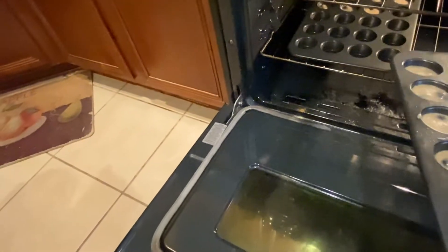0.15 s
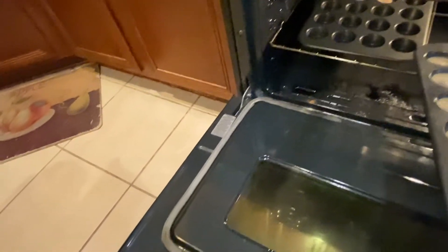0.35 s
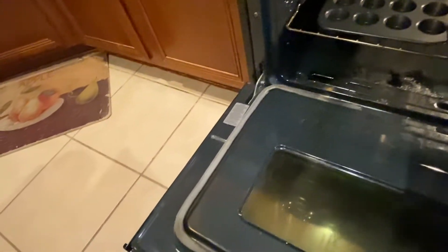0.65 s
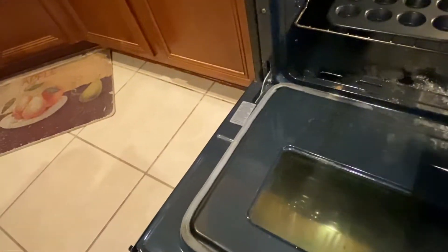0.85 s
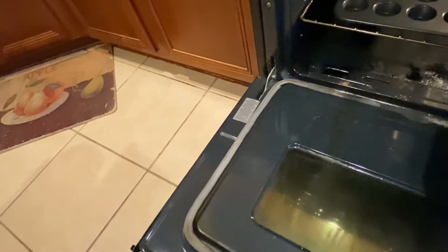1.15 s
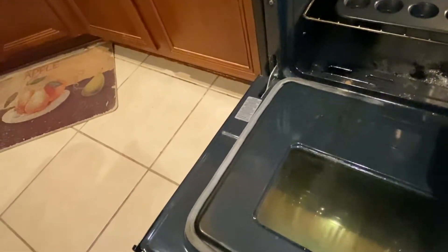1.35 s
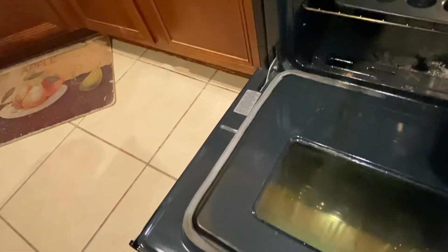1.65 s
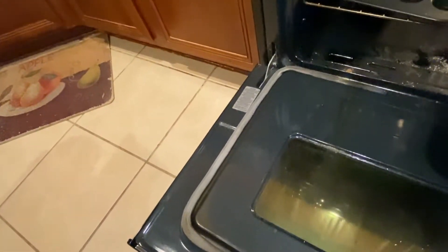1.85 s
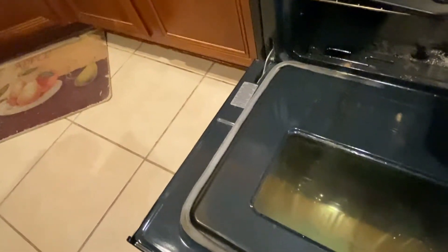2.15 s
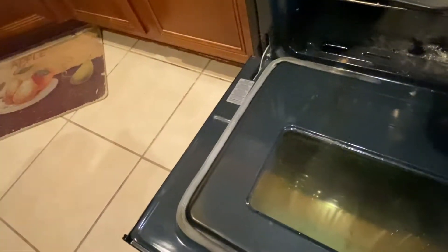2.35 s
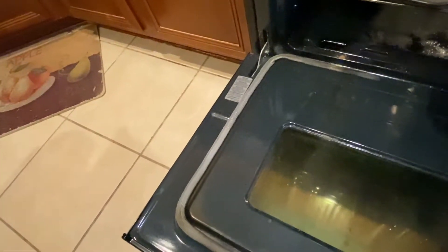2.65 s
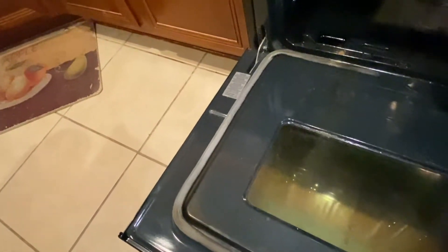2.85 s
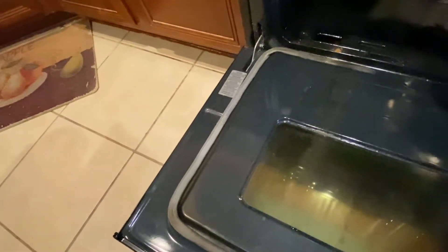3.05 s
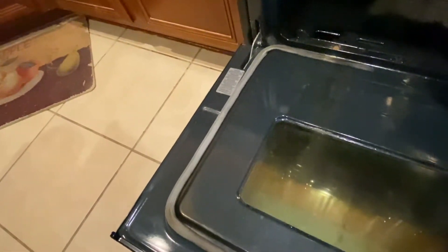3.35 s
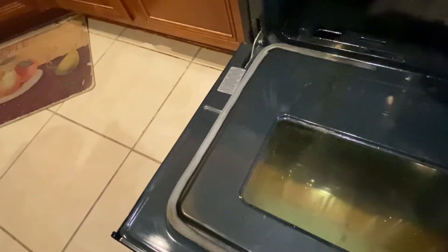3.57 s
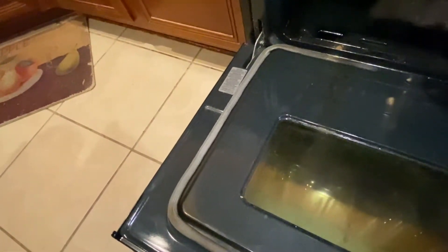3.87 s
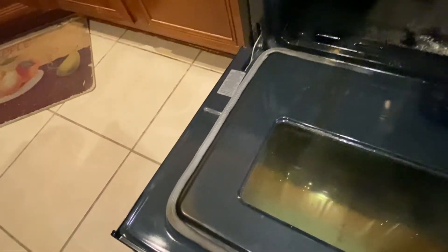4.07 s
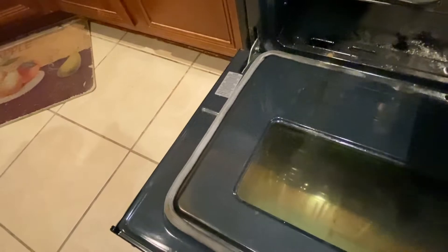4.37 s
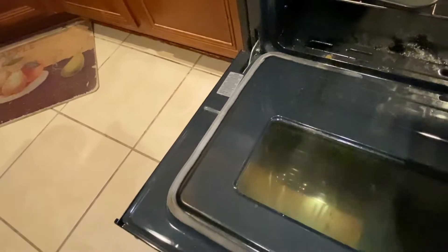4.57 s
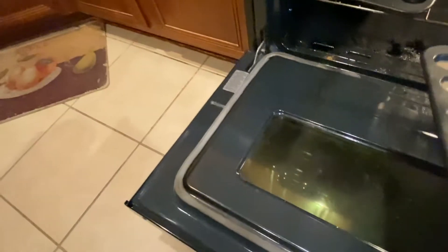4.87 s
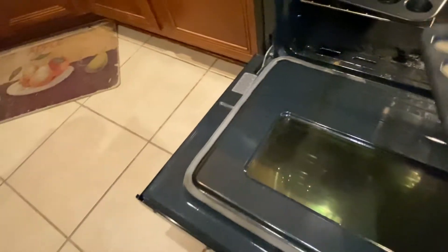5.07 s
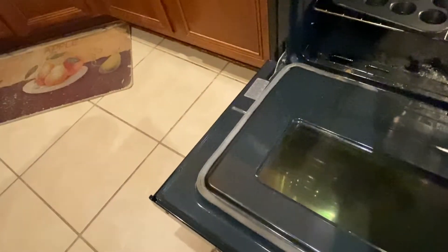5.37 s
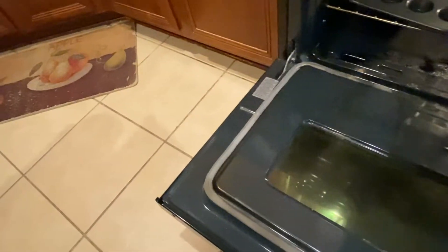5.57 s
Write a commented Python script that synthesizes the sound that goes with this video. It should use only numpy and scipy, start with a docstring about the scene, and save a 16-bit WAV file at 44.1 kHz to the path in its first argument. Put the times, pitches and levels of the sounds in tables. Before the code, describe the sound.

Close stereo sound inside a tiled kitchen: quiet motor hum first, then a dense burst of bright, short metallic clanks as tins are put down and pushed along oven wires, with hollow sheet-metal rumble. Light rubbing and tiny taps follow, then a thumping knock, a brief squeaky slide, another knock, and near-silence with fan.

```python
"""A fan motor hums in a kitchen; then metal muffin tins are set down, knocked and slid on a wire oven rack.
Light contacts clank: band-shaped noise, dense sheet modes and damped sinusoids of the tin and its cups.
Sliding rasps: uneven slip noise excites resonances. Heavy drops thump the oven's sheet-steel walls with a
falling sine and ringing modes, while low noise and a swelling low note rumble as the rack moves.
Decaying noise tails give the room; two close microphone ports differ in level and phase."""
import sys
import numpy as np
from scipy import signal
from scipy.fft import rfft, irfft, next_fast_len
from scipy.io import wavfile
from scipy.ndimage import uniform_filter1d, map_coordinates

SR = 44100
rng = np.random.default_rng(int(sys.argv[2]) if len(sys.argv) > 2 else 0)


def store_wav(level_fs):
    """Save 16-bit WAV to argv[1]."""
    pcm = np.round(np.clip(np.atleast_2d(level_fs), -1, 1) * 32767)
    wavfile.write(sys.argv[1], SR, pcm.T.astype(np.int16))


N = 252252

# Tin on wire: t/s, level/dB, rise/ms, bass tilt/dB (gain at 800 Hz), treble tilt/dB (9.5 is added at 8 kHz), #
# one cup f/Hz, its relative level/dB, another cup f/Hz, its relative level/dB
CONTACTS = [(0.89, -59, 2.9, -8, -13, 5640, -12, 6300, -10),
            (0.9318, -13.5, 2.2, 6.5, -13.5, 1100, -9, 3100, -10.5),
            (0.942, -19, 3, 5, -30, 948, -1, 1133, -3),
            (0.9903, -17.5, 1.4, -13, -22.5, 3340, -2, 4490, -9),
            (1.075, -32, 2, -4, -29, 3900, -9, 3290, -10), (1.146, -34, 3.3, 1, -26, 2980, -6, 4460, -10),
            (1.2293, -24, 0.73, 9.5, -22.5, 1163, -2, 3900, -7.5),
            (1.345, -14, 2.9, -1, -8, 1050, -14, 3650, -9),
            (1.366, -16.5, 1.5, 4.5, -15.5, 1078, -5.5, 3100, -20),
            (1.388, -21.5, 4.6, 3.5, -14, 1100, -7, 3400, -10),
            (1.419, -13.5, 6.4, 3.5, -10, 4024, -9, 4820, -10),
            (1.44, -21, 4, -1, -12.5, 3100, -8, 5800, -10),
            (1.4587, -17, 3.7, -1, -11.5, 3360, -8, 6560, -11),
            (1.4958, -23.5, 1.1, 5.5, -18, 1220, -27, 2300, -25),
            (1.512, -33, 2, 2, -15, 3280, -11, 4400, -4), (1.562, -38.5, 2, -7, -22, 2040, 8, 3400, -21),
            (1.688, -29.5, 1.4, 2.5, -20, 1120, -12, 2060, -5),
            (1.72, -16, 9.4, -0.5, -3, 1086, 1.5, 5240, -4),
            (1.7961, -7.5, 0.81, -8, -15.5, 3070, -5, 1440, -11.5),
            (1.8545, -19, 1.7, -2, -8.5, 2050, -6, 4550, -14),
            (1.903, -36.5, 1.8, 6, -14.5, 2330, -9, 5220, 3.5),
            (2.029, -17.5, 4, -9, -8, 2250, -8, 4680, -20),
            (2.0476, -18, 8.2, 3, -17.5, 3090, -8, 1887, -6),
            (2.091, -25, 2.1, 2.5, -16, 1855, -1, 3937, -8),
            (2.122, -35.5, 2.8, 5, -23, 2313, 7.5, 3120, 0), (2.134, -39, 4, -5, -29, 894, 7.5, 4060, -12),
            (2.172, -44.5, 3.3, -13, -24, 2260, 10, 855, -4), (2.25, -37, 3.6, 7, -23, 3060, -5, 2400, -12),
            (2.261, -33.5, 4, -11, -28.5, 986, -4.5, 1785, 0),
            (2.3065, -38.5, 3, -1, -24.5, 990, -1.5, 2650, -10),
            (2.364, -32.5, 5.6, -0.5, -16, 1133, -6, 5740, -7),
            (2.433, -36, 2.1, 0, -24, 2280, -2, 5700, -9), (2.535, -49, 3, -9, -13, 5800, -7, 1080, -11),
            (2.579, -47, 2, -2, -20, 5950, -10, 2350, -10),
            (2.635, -45.5, 5.3, -22, -29, 3930, 3, 4300, -3),
            (2.652, -42.5, 1.8, -26, -22, 2590, -6, 3110, -6),
            (2.681, -46.5, 4, -12, -11, 4050, -6, 6600, -13),
            (2.7945, -33.5, 6.6, -22, -30, 3120, -6, 3940, -8),
            (2.83, -40, 3.2, -10, -26.5, 2170, -9, 3980, -11),
            (2.856, -42, 3, -3, -18, 3980, -10, 2380, -8), (2.883, -45, 2.7, -2, -15, 2670, 0, 3360, -10),
            (2.925, -48, 3.6, 12, -6.5, 930, -11, 6650, -13),
            (2.9814, -42.5, 1.6, -2, -14, 2330, -1, 3935, -8),
            (3.069, -46.5, 1.5, 1.5, -30.5, 2270, -2.5, 1030, -22),
            (3.171, -44.5, 1.6, -9, -22.5, 2307, -5, 4000, -13.5),
            (3.412, -51, 2.8, 3, -31.5, 2400, -7, 1310, -5.5),
            (3.429, -37, 3.2, 8.5, -31, 1097, -1, 2230, -1),
            (3.437, -39.5, 1.8, 7.5, -43.5, 1484, 8.5, 2300, -4),
            (3.463, -44, 3.6, 4.5, -27, 1190, -3, 2100, -10),
            (3.492, -49, 2.7, -1.5, -14, 3330, -12, 2730, -8),
            (3.5145, -47, 4, 3, -42, 1210, -2.5, 5520, -11), (3.982, -46, 6, -8, -22.5, 2570, 0, 4000, -4),
            (4.0334, -16, 0.86, 6, -20.5, 993, -22, 1544, -14), (4.095, -38, 3, 3, -24, 2630, -2, 4000, 0),
            (4.187, -30, 2.8, 1, -16, 2630, -9, 2370, -23),
            (4.3381, -24, 0.66, 12.5, -21, 905, -9, 1186, -16),
            (4.787, -51, 0.45, -1.5, -33, 1890, -1.5, 950, -8.5),
            (5.1258, -64.5, 2, 6, 0, 6290, -12.5, 2610, -18),
            (5.188, -61, 1.6, 16, -6, 6350, -14, 2610, -20),
            (5.366, -70.5, 2.1, 13.5, 1, 2740, -20, 6200, -19.5),
            (5.429, -65.5, 2.2, 9.5, -1.5, 6230, -13.5, 2610, -17.5),
            (5.665, -58, 2.9, 11.5, -9.5, 2580, -13.5, 6160, -19)]
# Clear modes of the tin: f/Hz, relative level/dB, t60/s (before the hand's damping)
TIN_MODES = [(1153, -10, 0.15), (1458, -8, 0.22), (1904, -6.5, 0.27), (2168, -6, .15), (2235, -3, 0.19),
             (2800, -5, .15), (3070, 0.5, 0.13), (3274, -4, 0.25), (3970, -0.5, .12), (4160, -6, .12),
             (4640, -9, 0.063), (5480, -10, 0.078), (6030, -2, 0.22), (6620, 3, 0.14), (7200, -6, .1)]
# Spectrum of the metallic crash: f/Hz, relative level/dB
CRASH_SPECTRUM = [(150, -22), (250, 3.5), (393, -9), (493, -14.5), (802, -22.5), (1080, -16), (1280, -25.5),
                  (1470, -15.5), (1730, -17.5), (7310, -16.5), (11900, -22), (13200, -43.5), (14400, -21),
                  (16000, -34.5)]
CLANK_T60_S, CUP_T60_S = 0.14, 0.065
NOISE_T60_SHARE = 0.84  # crash noise at 3 kHz, as a share of the clank's t60
TIN_DB, CUP_ROOM_DB = -19.5, -7  # clear modes under the crash; the cups reach the room weaker
SHEET_DB, SHEET_SCATTER_DB = -4.5, 2.5  # peak of the dense modes beside the crash; their spread per blow
SHEET_T60_S = 0.17  # middle value at 3 kHz

# Rubbing on the wires, one list per stroke (drag, push, drag, pull, last drag): t/s, rasp level/dB
RUB_STROKES = [
    [(0.98, -72), (1.09, -52), (1.57, -53), (1.91, -46), (2.15, -54), (2.31, -54.5), (2.6, -65),
     (2.7, -61.5), (2.8, -52), (2.96, -62), (3.09, -73), (3.23, -90)],
    [(3.76, -93), (3.83, -70), (3.87, -61), (3.914, -54), (4.002, -48.5), (4.035, -53.5)],
    [(4.035, -53), (4.161, -55), (4.237, -50), (4.345, -60.5)],
    [(4.345, -78), (4.409, -56.5), (4.639, -61), (4.77, -69), (4.82, -75), (4.87, -74), (4.95, -92)],
    [(4.75, -86), (4.9, -74.5), (5.271, -88)],
]
# Resonances of the dragged tin: f/Hz, width/Hz, relative level/dB
DRAG_PEAKS = [(1190, 90, -4.5), (2200, 350, -4), (2612, 140, -9), (3050, 56, -17), (3390, 36, -10),
              (4150, 140, -4), (5100, 150, -13.5), (6850, 56, -2)]
# Resonances that a push keeps singing: f/Hz, width/Hz, relative level/dB
PUSH_PEAKS = [(2600, 190, -6), (3208, 90, -6.5), (4000, 88, -2), (5050, 69, -4.5), (7060, 200, -11.5),
              (7810, 110, -10.5)]
# Resonances that a pull keeps singing: f/Hz, width/Hz, relative level/dB
PULL_PEAKS = [(1778, 230, -7), (2418, 70, 2), (3286, 120, -12), (4123, 260, -3), (4630, 200, -5.5),
              (5620, 230, 0.5), (6800, 370, -9.5)]
IDLE_RASP_DB, IDLE_HISS_DB = -81.5, -89  # the hand never holds the tin quite still

# Heavy drops: t/s, thump level/dB, wall boom level relative to the thump/dB
HEAVY_DROPS = [(0.9319, -10, -27), (1.23, -17, -13.5), (4.033, -11, -19), (4.3378, -15.5, -35)]
# Modes of the oven walls: f/Hz, relative level/dB, t60/s (limited to 0.8 s when rung)
WALL_MODES = [(117.8, -8, 1.4), (259, -2, 0.12), (354, 2, 0.2), (500, -9, 5.0), (630, -14, 0.39)]
GLIDE_FROM_HZ, GLIDE_TO_HZ, GLIDE_S = 494.7, 111, 0.0095
THUMP_RISE_S, THUMP_HOLD_S, THUMP_T60_S = 0.0094, 0.022, 0.035

# Wall rumble while the rack moves: t/s, level/dB
RACK_LEVEL = [(0.89, -61), (0.97, -38.5), (1.27, -45.5), (1.39, -32), (1.52, -33), (1.68, -47.5),
              (1.85, -28.5), (2.05, -44.5), (2.68, -51.5), (2.82, -47), (2.98, -49), (3.27, -62),
              (3.48, -46.5), (3.72, -61.5), (3.91, -51), (4.03, -53), (4.24, -44), (4.38, -61),
              (4.48, -42.5), (4.56, -51), (5.72, -66)]
# Spectrum of the wall rumble: f/Hz, relative level/dB
RUMBLE_SPECTRUM = [(47, -34), (80, -9), (108, -2), (205, -11), (256, 2.5), (334, -19), (471, -12),
                   (559, -20.5), (900, -23), (1170, -24), (1980, -120)]
# Jolts that set the cavity's lowest note swelling: t/s at its maximum, level/dB
CAVITY_JOLTS = [(0.98, -35), (1.1, -44.5), (1.29, -39.5), (1.44, -40), (1.54, -43), (1.91, -34.5),
                (2.08, -41), (2.22, -48.5), (2.62, -47.5), (2.979, -47.5), (4.121, -34.5), (4.401, -42),
                (5.0, -55)]
BOOM_SWELL_S, BOOM_T60_S, BOOM_HZ = 0.03, 0.38, 58

# Reverberation of oven cavity and kitchen: f/Hz, t60/s
ROOM_T60 = [(100, 0.24), (500, 0.52), (2000, 0.44), (6000, 0.39), (14000, 0.04)]
# Tins and echoes, likeness at the two ports: f/Hz, correlation
TIN_LIKENESS = [(60, 0.96), (300, .85), (750, .7), (1000, 0.93), (1400, 0.29), (2200, 0.052), (9000, 0.88),
                (14000, 0.061)]
# Left port over right: f/Hz, level/dB
PORT_LEAN = [(60, -2.5), (150, -6), (380, -4), (950, -2), (2380, -0.5), (5980, -0.5), (15000, -2)]
# Phase by which the left port lags the right: f/Hz, lag/rad
PORT_LAG = [(50, .55), (300, .75), (500, 1.6), (700, 2.6), (950, 1.5), (1300, 1.6), (1800, 2.4),
            (2500, 1.6), (10000, 1.6), (14000, 0)]

# Spectrum of the fan's air noise: f/Hz, relative level/dB
AIR_SPECTRUM = [(15, -26), (25, -11), (81, -3), (129, -23.5), (158, -6.5), (205, -8), (240, -6),
                (374, -10.5), (415, -12), (485, -13.5), (1110, -24.5), (1440, -31.5), (1560, -37),
                (12500, -65), (16200, -95.5), (22000, -120)]
# Fan noise, likeness at the two ports: f/Hz, correlation
AIR_LIKENESS = [(60, 0.67), (200, 0.94), (330, -0.16), (520, 0.17), (720, -0.65), (1200, -0.01),
                (3000, 0.41), (10000, -0.86), (14500, 0.91)]
# Tones of the fan motor: f/Hz, rms level/dB before unsteadiness and port balance
MOTOR_TONES = [(59.2, -58), (75.4, -63), (188.4, -57), (376.8, -72.5), (468.3, -77.5)]
AIR_DB = -56  # before unsteadiness and port balance
TOP_HZ = 16000


def clanks():
    """Impact excitation: a brief contact rings many modes; noise, dense modes, clear modes and cups add up."""
    out, cups = np.zeros((2, N + SR)), np.zeros(N + SR)
    t = np.arange(SR // 4) / SR
    modes = sheet(t, count=200)
    for s, db, rise_ms, low_db, top_db, cup_hz, cup_db, next_hz, next_db in CONTACTS:
        hit = crash(t)
        rattle = chatter(t, CLANK_T60_S, count=70)
        hit += amp(-4.0) * rattle / np.abs(rattle).max()
        draw = rng.standard_normal((2, 2, len(modes)))
        dense = (draw[0] * amp(SHEET_SCATTER_DB * draw[1])) @ modes
        hit += amp(SHEET_DB) * dense / np.abs(dense).max()
        # the hand damps the tin; its clear modes enter the first channel only
        hit[0] += amp(TIN_DB - 30 * t / CLANK_T60_S) * ring(TIN_MODES, t, scatter_db=3)

        rise_s = max(rise_ms, 0.3) / 1000
        onset = amp(db) * (1 - np.exp(-(t / rise_s) ** 2))
        tilt = [(800, low_db), (2200, 0.0014), (4500, 0.16 * (top_db + 13.5)), (8000, top_db + 9.5)]
        start = round(s * SR)
        cup_modes = split_pair(cup_hz, cup_db) + split_pair(next_hz, next_db)
        cups[start:][:len(t)] += onset * ring(cup_modes, t, scatter_db=1.5)
        out[:, start:][:, :len(t)] += onset * filtered(hit, lambda hz: amp(along(tilt, hz)))
    return out[:, :N], cups[:N]


def crash(t):
    """Frequency-dependent damping: shaped noise at peak 1 dies faster in the treble."""
    hz, frame, z = signal.stft(rng.standard_normal((2, len(t))), SR, nperseg=128)
    life = NOISE_T60_SHARE * CLANK_T60_S * (np.maximum(hz, 300) / 3000)[:, None] ** -0.25
    z = z * amp(along(CRASH_SPECTRUM, hz))[:, None] * amp(-60 * frame / life)
    noise = signal.istft(z, SR, nperseg=128)[1][:, :len(t)]
    return noise / np.abs(noise).max()


def chatter(t, t60, count):
    """Repeated impact: the tin bounces on other wires; each tiny touch rings one short mode of its own."""
    draw = rng.random((4, count, 1))
    hz = 700 * 14 ** draw[0]
    late = -0.1 * t60 * np.log(draw[1])
    age = np.clip(t - late, 0, 1)
    touch_t60 = 0.0046 + 0.041 * draw[3]
    strength_db = along(CRASH_SPECTRUM, hz) - 2 * np.log(draw[2]) - 30 * late / t60
    touches = amp(strength_db - 60 * age / touch_t60) * np.sin(2 * np.pi * hz * age)
    return touches.reshape(2, -1, len(t)).sum(1)  # half the touches to each channel


def sheet(t, count):
    """Modal density of a plate: sine and cosine of each mode, with pitch and life kept from blow to blow."""
    draw = rng.standard_normal((2, count, 1))
    hz = np.geomspace(700, 12000, count)[:, None] * np.exp(0.01 * draw[0])
    t60 = SHEET_T60_S * (hz / 3000) ** -0.3 * np.exp(0.3 * np.clip(draw[1], -2, 2))
    fade = amp(along(CRASH_SPECTRUM, hz) - 60 * t / t60) * np.sqrt(hz / 3000)
    phase = 2 * np.pi * hz * t
    return np.concatenate([fade * np.sin(phase), fade * np.cos(phase)])


def split_pair(hz, db):
    """Beating: a split cup mode has a weaker partner 3 % higher."""
    return [(hz, db, CUP_T60_S), (1.03 * hz, db - 8, CUP_T60_S)]


def strokes():
    """Stick-slip friction: the rim catches on the wires in uneven slips that feed the tin's resonances."""
    hiss = rng.standard_normal((2, N)) * amp(1.5 * wobble(300) + 2.9 * wobble(54))
    hiss = unit(filtered(hiss, lambda f: amp(along(CRASH_SPECTRUM, f)) / (1 + (6000 / (f + 1)) ** 6)))
    out = amp(IDLE_HISS_DB + 3 * wobble(3.7)) * hiss
    # peaks, broadband bed gain, jolts per second, patch depth/dB, hiss relative to rasp/dB
    drag = (DRAG_PEAKS, 0.2, 150, 4, -16)
    push = (PUSH_PEAKS, 0.17, 10, 3.5, -17)
    pull = (PULL_PEAKS, 0.1, 6, 2.5, -16)
    idle = [(0, IDLE_RASP_DB), (N / SR, IDLE_RASP_DB)]
    kinds = [drag, drag, push, drag, pull, drag]  # the first is the idle hand
    for rows, (peaks, bed, rate, patch_db, hiss_db) in zip([idle] + RUB_STROKES, kinds):
        rasp_db, = controls(rows)
        slips = rng.standard_normal((2, N)) * amp(0.64 * wobble(300)) * jolts(rate)
        rasp = filtered(slips, lambda f: (bed * (f > 600) + resonances(peaks)(f)) / (1 + (f / 7500) ** 4))
        out += amp(rasp_db) * (unit(shifting(rasp, patch_db)) + amp(hiss_db) * hiss)
    return out


def jolts(rate):
    """Impulsive modulation: random kicks, rate a second, raise the gain, which relaxes with a 38 ms constant."""
    kicks = (rng.random(N) < rate / SR).astype(float)
    return 1 + signal.lfilter([1], [1, -np.exp(-1 / (0.038 * SR))], kicks)


def resonances(peaks):
    """Forced resonance: causal second-order peaks added with alternating sign."""
    def response(f):
        total = 0
        for k, (center, width, db) in enumerate(peaks):
            damping = 1j * f * width
            total = total + (-1) ** k * amp(db) * damping / (center ** 2 - f ** 2 + damping)
        return total
    return response


def shifting(x, depth_db):
    """Moving excitation points: partials come and go in random gain patches over time and frequency."""
    z = signal.stft(x, nperseg=256)[2]
    field = uniform_filter1d(rng.standard_normal(z.shape[1:]), size=2, axis=0)
    field = uniform_filter1d(field, size=14, axis=1)
    return signal.istft(z * amp(depth_db * unit(field)), nperseg=256)[1][:, :N]


def drops():
    """Bending-wave dispersion: sheet steel carries highs fastest, so the thump glides down; then walls ring."""
    out, t = np.zeros(N + SR), np.arange(SR // 2) / SR
    glide_hz = GLIDE_TO_HZ + (GLIDE_FROM_HZ - GLIDE_TO_HZ) * np.exp(-(t / GLIDE_S) ** 1.83)
    thump = np.sin(2 * np.pi * np.cumsum(glide_hz) / SR) * (1 - np.exp(-(t / THUMP_RISE_S) ** 1.2))
    thump = thump * amp(-60 * np.clip(t - THUMP_HOLD_S, 0, 1) / THUMP_T60_S)
    for s, db, boom_db in HEAVY_DROPS:
        boom = amp(boom_db) * ring(WALL_MODES, t, scatter_db=4) * (1 - np.exp(-(t / 0.054) ** 2))
        out[round(s * SR):][:len(t)] += amp(db) * (thump + boom)
    return out[:N]


def shake():
    """Forced wall vibration and cavity resonance: walls rumble; the lowest note swells at jolts and dies."""
    rumble_db, = controls(RACK_LEVEL)
    rumble = unit(filtered(rng.standard_normal(N), lambda f: amp(along(RUMBLE_SPECTRUM, f))))
    t = np.arange(N) / SR
    swell = np.zeros(N)
    for s, db in CAVITY_JOLTS:
        rise = np.exp(-(np.clip(s - t, 0, None) / BOOM_SWELL_S) ** 2)
        swell += rise * amp(db - 60 * np.clip(t - s, 0, None) / BOOM_T60_S)
    boom_hz = BOOM_HZ + 2.54 * wobble(6.7)
    boom = np.sqrt(2) * np.sin(2 * np.pi * np.cumsum(boom_hz) / SR)
    return amp(rumble_db) * rumble + swell * boom


def room(x):
    """Reverberation of cavity and kitchen: each frequency has its own decay; a new tail every quarter second."""
    out, step = np.zeros((2, N + SR)), SR // 4
    delay = 150  # samples before the echoes
    for a in range(0, N, step):
        hz, t, z = signal.stft(rng.standard_normal((2, SR // 2)), SR, nperseg=256)
        decay = amp(-60 * t / along(ROOM_T60, hz)[:, None])
        tail = signal.istft(z * decay, SR, nperseg=256)[1]
        wet = signal.fftconvolve(x[None, a:a + step], tail / np.linalg.norm(tail[0]), axes=1)
        out[:, a + delay:a + delay + wet.shape[1]] += wet
    return out[:, :N]


def ports(x):
    """Interaural-style differences: the two microphone ports differ in level and phase."""
    half = np.array([[0.5], [-0.5]])
    return filtered(x, lambda hz: amp(half * along(PORT_LEAN, hz)) * np.exp(-1j * half * along(PORT_LAG, hz)))


def kitchen():
    """Broadband flow noise and rotational tones: fan air noise with the motor's slightly unsteady tones."""
    air = filtered(rng.standard_normal((2, N)), lambda hz: amp(along(AIR_SPECTRUM, hz)))
    air = amp(AIR_DB + 0.3 * wobble(11.0)) * unit(spread(air, AIR_LIKENESS))
    t = np.arange(N) / SR
    hum = np.zeros(N)
    for hz, db in MOTOR_TONES:
        tone = np.sin(2 * np.pi * hz * t + 0.7 * wobble(6))
        hum += np.sqrt(2) * amp(db + 2.5 * wobble(9.8)) * tone
    return (air + hum) * amp([[-1.2], [1.2]])  # stronger at the right port


def ring(modes, t, scatter_db):
    """Modal superposition: damped sines at new random strengths and phases."""
    hz, db, t60 = np.transpose(modes)[..., None]
    draw = rng.standard_normal((2, len(hz), 1))
    fade = amp(db + scatter_db * draw[0] - 60 * t / np.clip(t60, 0.02, 0.8))
    return np.sum(fade * np.sin(2 * np.pi * hz * t + 9 * draw[1]), 0)


def spread(pair, alike):
    """Partial coherence: two signals become mid and side, for a frequency-dependent left-right likeness."""
    def mid_side(hz):
        turn = np.arccos(np.clip(along(alike, hz), -1, 1)) / 2
        return np.array([np.cos(turn), np.sin(turn)])
    mid, side = filtered(pair, mid_side)
    return np.array([mid + side, mid - side])


def filtered(x, response):
    """Linear filtering: the spectrum of x times a response of frequency."""
    m = next_fast_len(x.shape[-1] + 8192)
    return irfft(rfft(x, m) * response(np.fft.rfftfreq(m, 1 / SR)), m)[..., :x.shape[-1]]


def wobble(rate):
    """Slow random modulation: a smooth curve through random knots, rate a second."""
    return map_coordinates(rng.standard_normal(int(N * rate / SR) + 4), [np.arange(N) * rate / SR])


def controls(rows):
    """Linear interpolation: one curve per column after the time, -120 outside the table."""
    s, *cols = np.transpose(rows)
    return [np.interp(np.arange(N) / SR, s, c, left=-120, right=-120) for c in cols]


def along(points, hz):
    """Logarithmic pitch scale: interpolate (f/Hz, value) points on a log frequency axis."""
    f, v = np.transpose(points)
    return np.interp(np.log(hz + 1), np.log(f + 1), v)


def amp(db):
    """Decibel law: amplitude gain of a level in dB."""
    return 10 ** (np.asarray(db) / 20)


def unit(x):
    """Root-mean-square normalization: x at rms 1."""
    return x / np.sqrt(np.mean(x ** 2) + 1e-20)


def scene():
    """Superposition: tins and oven, their echoes, and the kitchen's fan."""
    crashes, cups = clanks()
    tins = crashes + strokes()
    oven = drops() + shake()
    echoes = room(amp(-9) * oven + amp(-7.5) * (tins[0] + amp(CUP_ROOM_DB) * cups))
    central_cups = [[1], [0]] * cups  # the mid signal only
    return ports(oven + spread(tins + central_cups + echoes, TIN_LIKENESS)) + kitchen()


def record(dry):
    """Band limitation: the microphone rolls off the deepest bass and keeps nothing from TOP_HZ up."""
    return filtered(dry, lambda hz: (hz < TOP_HZ) / (1 + (44 / (hz + 1)) ** 9))


dry = scene()
out = record(dry)
store_wav(out)
```